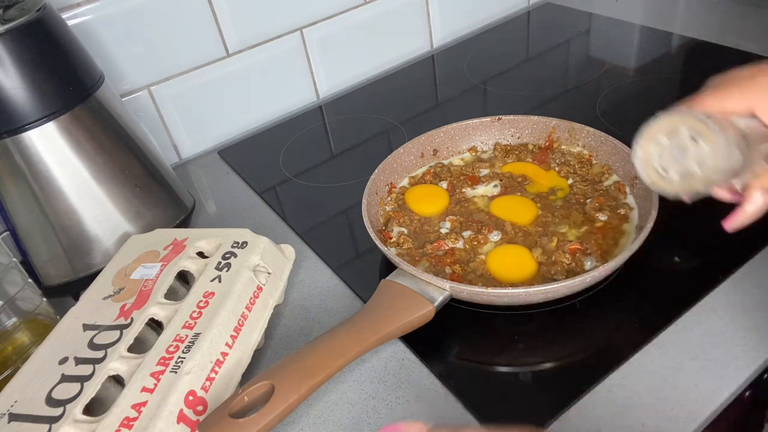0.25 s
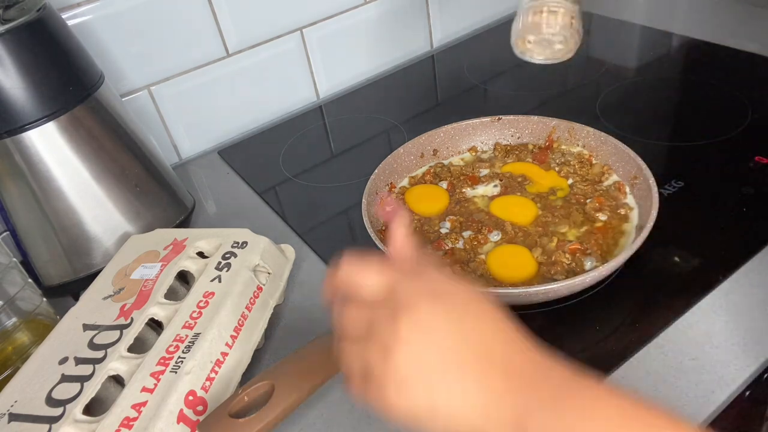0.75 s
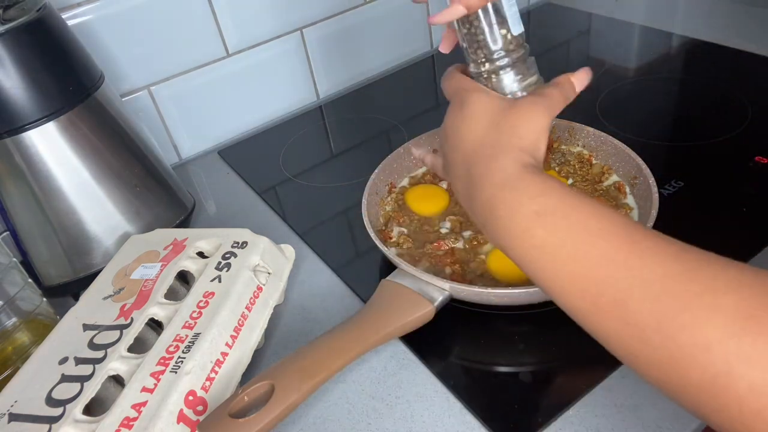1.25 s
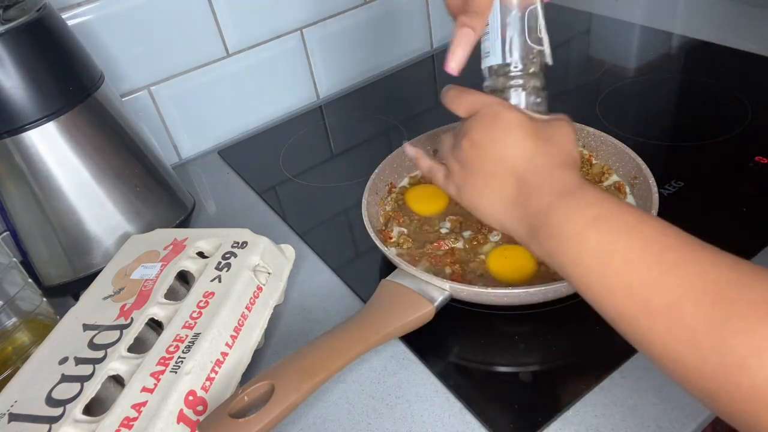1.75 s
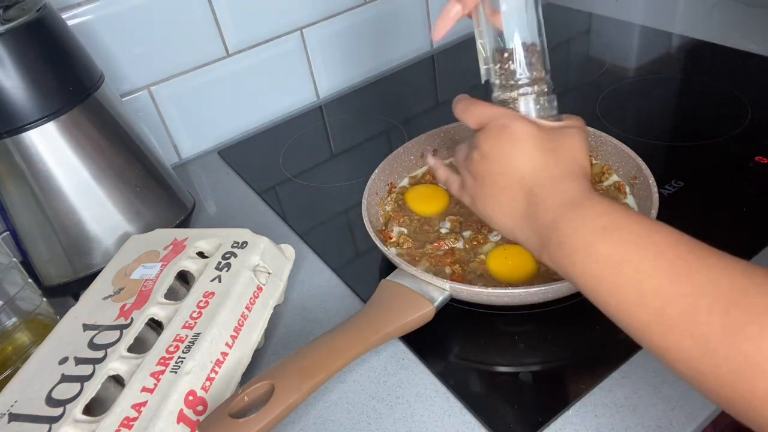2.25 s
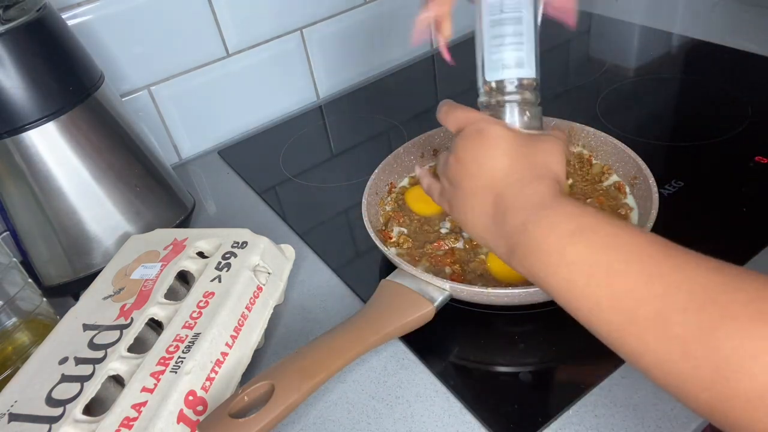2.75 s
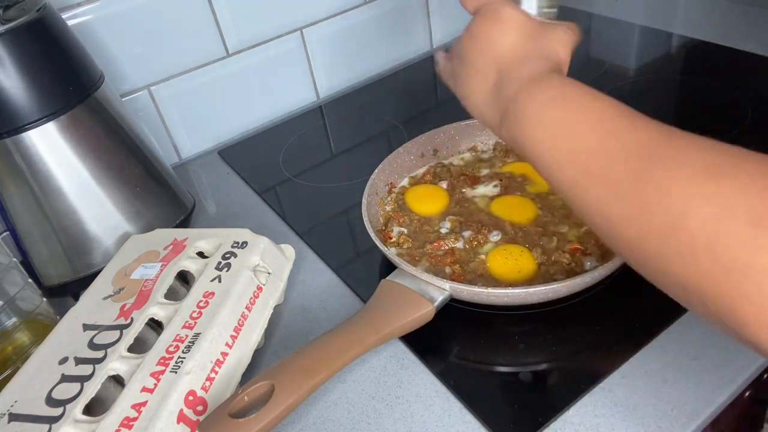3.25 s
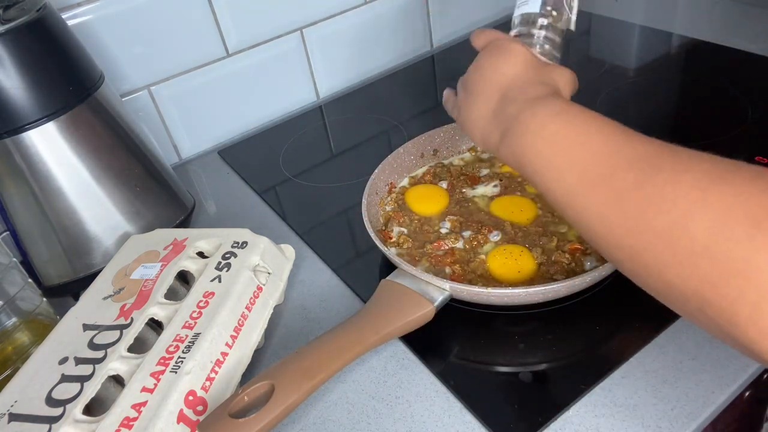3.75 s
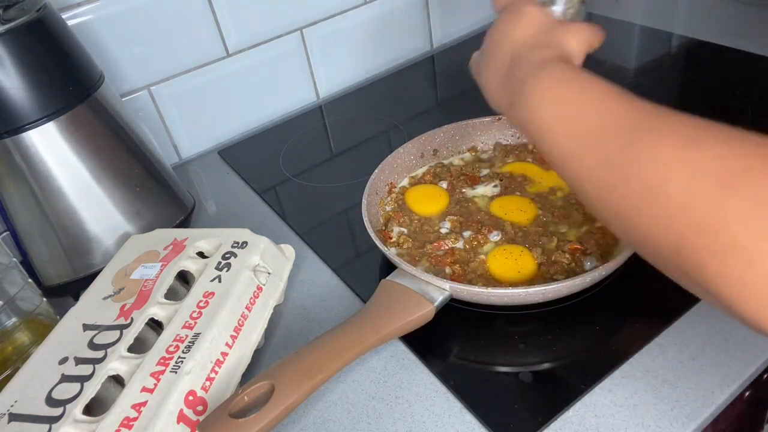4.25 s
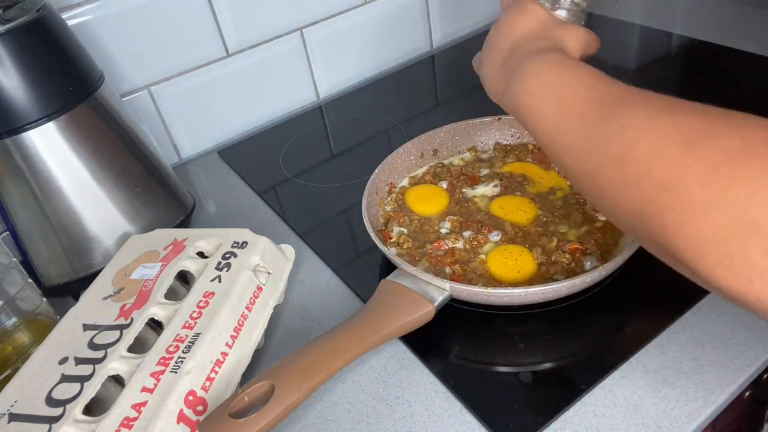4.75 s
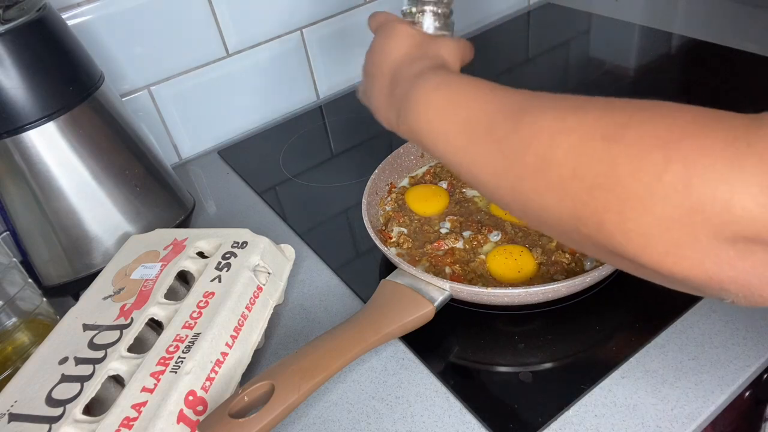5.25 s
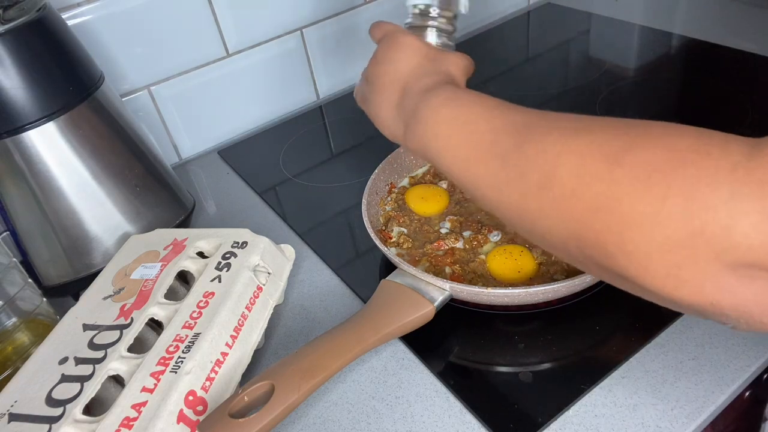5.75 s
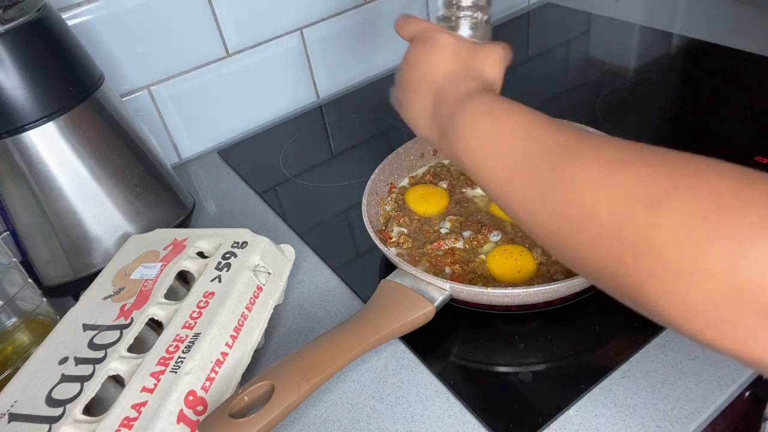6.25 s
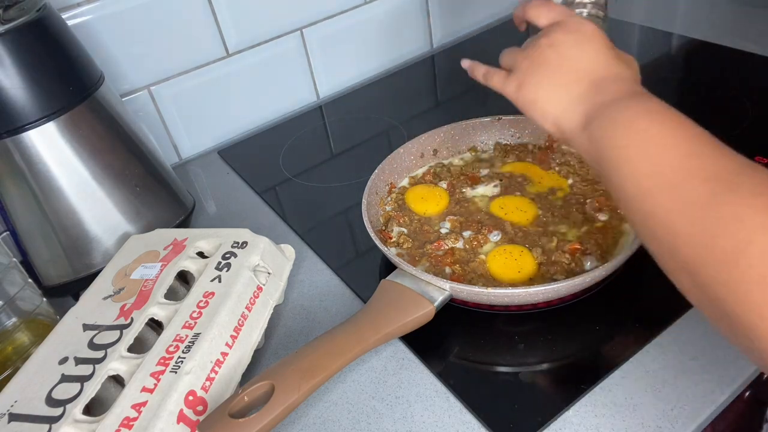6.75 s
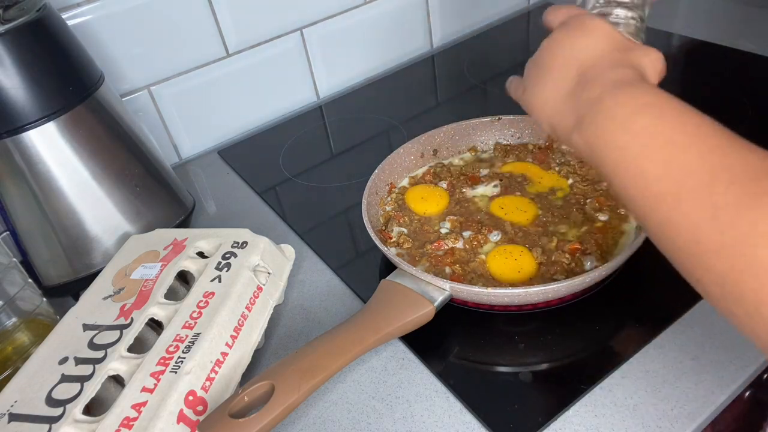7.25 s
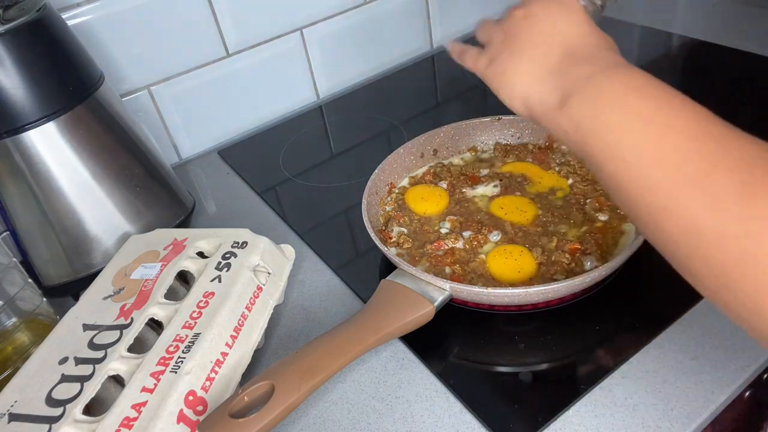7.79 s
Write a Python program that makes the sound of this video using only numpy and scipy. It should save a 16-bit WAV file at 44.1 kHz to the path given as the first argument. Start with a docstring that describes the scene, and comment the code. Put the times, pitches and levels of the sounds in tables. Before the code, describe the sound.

A small kitchen, heard close by a stereo phone, with quiet low rumble, faint steady mains hum and a distant engine slowly rising in pitch until about 3.2 s. At 0.2-0.35 s three hard, light knocks mark a glass pepper mill being lifted; corns slide faintly down the jar at 0.6-1 s. Soft crunches begin at 1.3 and 1.5 s, then a tick at 1.85 s starts regular twisting, roughly three a second. Each twist is a short dry crunch with brittle, bright snaps, a small hollow knock, and corns pattering on glass; sharp ticks precede most. The strongest cracks come near 3.15, 3.9 and 4.2 s, with another at 5.3 s. The far engine returns from 4.4 s, rising slowly. Twists grow less regular after 5.5 s; at 7.4-7.5 s a tick, crunch and tiny rough high squeak come last, leaving faint crumbs and rumble until 8 s.

```python
"""A glass pepper mill is picked up, tipped over a pan and twisted about three times a second in a small kitchen.
The burr crunches and peppercorns burst as uneven fractures driving husks, housing and hollow cap.
The cap ticks before most twists, loose corns patter and ring the jar, and the burr squeals once: a rough sine.
Behind it lie a mains hum (a sine), a low rumble (shaped noise) and a far engine (shaft orders) that
speeds up twice."""
import sys
import numpy as np
from scipy import signal
from scipy.fft import rfft, irfft
from scipy.io import wavfile
from scipy.ndimage import uniform_filter1d

SR = 44100
rng = np.random.default_rng(int(sys.argv[2]) if len(sys.argv) > 2 else 0)


def pcm_store(signal):
    """Save signal as 16-bit PCM."""
    levels = np.round(np.clip(np.atleast_2d(signal), -1, 1) * 32767)
    wavfile.write(sys.argv[1], SR, levels.astype(np.int16).T)


N = 353682
TIME = np.arange(N) / SR  # s

# All levels in the tables are relative; the functions set the balance between layers.
# Twists of the burr. Each row: start in seconds, length in seconds, level in dB, extra level of dry husks in dB.
TWISTS = [(1.281, .169, -61.5, 4.5), (1.467, .139, -50.5, 2), (1.96, 0.1, -48, 11),
          (2.401, 0.086, -43.5, -8), (2.748, .07, -47.5, 2), (3.141, 0.072, -42.5, 9),
          (3.491, 0.087, -44, 11.5), (3.847, 0.055, -47.5, 7), (4.174, .09, -42, -1.5),
          (4.534, 0.063, -49, 7.5), (4.865, 0.087, -44, 5.5), (5.079, 0.028, -50.5, 3),
          (5.268, 0.081, -49, -8), (5.618, 0.086, -51, 5.5), (5.93, 0.012, -51, 15),
          (6.301, 0.13, -51.5, 5.5), (6.588, 0.093, -67, 9), (7.019, 0.12, -46, 2.5),
          (7.456, 0.066, -43.5, 7)]
# Loudest peppercorns bursting. Each row: time in seconds, snap of the husk in dB, knock on the housing in dB,
# thud in the cap in dB, crumbling time constant in seconds.
BURSTS = [(1.2813, -32.5, -47.5, -48, 0.0037), (1.3548, -35, -50, -57, .0045),
          (1.517, -33.5, -41, -49, 0.0052), (1.5341, -26, -43, -44, 0.0026),
          (1.593, -33, -42.5, -42, 0.0022), (1.954, -33.5, -37.5, -59, 0.00073),
          (2.0255, -19, -29, -55, 0.0015), (2.0367, -23, -31, -38.5, .0028), (2.386, -32, -46, -47, .0045),
          (2.417, -18, -28.5, -35.5, 0.0036), (2.4443, -23.5, -45, -40, 0.0052),
          (2.4609, -18.5, -35.5, -37, 0.003), (2.7606, -29, -40, -63, 0.0013),
          (2.773, -24.5, -29.5, -36.5, 0.002), (2.816, -22, -42, -38, 0.0055),
          (3.1334, -28.5, -37.5, -52, 0.0037), (3.148, -8.5, -22.5, -36, 0.0025),
          (3.168, -33, -39, -43, 0.0028), (3.423, -28.5, -48, -44.5, .0015),
          (3.4968, -26, -43.5, -50, 0.0017), (3.8609, -29, -43, -45, .004),
          (3.9164, -11, -28.5, -42.5, 0.0022), (4.1923, -10, -29, -32, 0.0015),
          (4.2126, -35, -42, -54, 0.0022), (4.3928, -40.5, -50, -59, 0.00084),
          (4.562, -18.5, -32.5, -55, 0.00082), (4.5739, -23, -39.5, -39, 0.00069),
          (4.601, -26, -42.5, -55, 0.0016), (4.8875, -22.5, -40.5, -50, 0.0058),
          (4.9035, -29, -42, -36.5, .0046), (5.248, -35, -49.5, -55, .0016),
          (5.2808, -15, -32, -30.5, .0046), (5.3284, -31, -39.5, -43.5, .0012),
          (5.64, -30, -50, -51.5, 0.0032), (5.6983, -30.5, -50, -61, 0.0037),
          (5.896, -26.5, -39, -46, 0.0026), (5.9204, -15.5, -32, -35.5, 0.0023),
          (6.1159, -39.5, -48.5, -55, 0.0014), (6.415, -30.5, -44.5, -46, 0.0019),
          (6.579, -28.5, -42.5, -44.5, 0.0044), (6.82, -36.5, -50, -50, 0.0014),
          (6.887, -33.5, -47.5, -48.5, 0.0025), (7.0188, -33, -51, -48.5, 0.0033),
          (7.0786, -21, -43, -46.5, 0.0028), (7.0966, -21, -37, -49, 0.0018),
          (7.4568, -28.5, -52, -65, 0.0024), (7.4781, -30, -39.5, -42, 0.0012)]
# The cap ticks as the grip reverses. Each row: time in seconds, level in dB.
CAP_TICKS = [(1.8536, -21), (2.319, -19.5), (2.7017, -12), (2.9092, -34), (3.0494, -19.5), (3.4417, -18),
             (3.7967, -13), (4.094, -28.5), (4.1238, -17.5), (4.4935, -13.5), (4.8218, -17.5), (4.993, -34),
             (5.1478, -21), (5.5937, -19.5), (5.7437, -28), (6.212, -24), (6.2621, -18), (6.6504, -30.5),
             (6.781, -33), (7.389, -14)]
# Light knocks as the mill is picked up. Each row: time in seconds, contact level in dB, housing level in dB.
PICKUP_KNOCKS = [(0.2269, -23, -33.5), (0.2695, -11, -40), (0.3298, -19, -74)]
# Loose corns slide down the tipped jar. Each row: time in seconds, level in dB.
SLIDE_LEVEL = [(0.52, -88), (0.616, -56), (0.71, -60.5), (0.788, -43), (0.882, -49), (1.08, -86)]
# The burr squeals once. Each row: time in seconds, pitch in Hz, level in dB.
SQUEAL_PATH = [(7.48, 5660, -48), (7.489, 4900, -36), (7.494, 4760, -51), (7.499, 4930, -37),
               (7.508, 5510, -31), (7.516, 5500, -48), (7.53, 5300, -70)]
# Colours of the brittle husks, the hollow cap and the tick. Each row: frequency in Hz, level in dB.
HUSK_COLOUR = [(1500, -22), (3000, -7.5), (3700, -9.5), (4600, -8), (6000, -2), (7000, -1.5), (8200, 2),
               (9500, -8.5), (12000, -11), (15500, -17)]
CAP_COLOUR = [(140, -33.5), (260, 5.5), (400, 3), (620, 3.5), (850, 1), (1250, 0), (2200, -11), (6000, -45)]
TICK_COLOUR = [(600, -59), (1300, -26.5), (2300, -6.5), (3000, -8.5), (4300, -3.5), (5600, -6.5),
               (7000, -0.5), (9500, -2.5), (12000, -7), (16000, -11)]
# Modes of the housing. Each row: multiple of its pitch, level in dB, 60 dB decay time in seconds.
HOUSING_MODES = [(.66, -6, 0.0034), (.85, 1, 0.0046), (1, 1, .01), (1.14, 1, 0.0056), (1.36, 1.5, 0.0069),
                 (1.6, -0.5, 0.0025)]
# Modes of the glass jar and of the whole mill. Each row: frequency in Hz, level in dB, 60 dB decay in seconds.
JAR_MODES = [(5920, -6.5, 0.027), (6170, 0, 0.04), (6240, 1, 0.038), (6490, 1, 0.017), (15150, -11, .03)]
MILL_MODES = [(2600, -1, 0.0048), (3330, -2, 0.0087), (3690, 2.5, 0.012), (4300, 0, 0.0068),
              (6460, -3.5, 0.008), (7200, -3.5, 0.0048)]
# A far engine pulls through two gears. Each row: start in seconds, end in seconds, shaft speed at the start in Hz,
# rise in Hz per second, level in dB, tilt in dB per order.
ENGINE_PULLS = [(-.2, 3.25, 20.2, 1.5, -47, -.5), (4.401, 8.3, 18.9, .7, -51, -2.5)]
# Orders heard from the engine: multiples of the shaft speed, then the strength of each in dB.
ENGINE_ORDERS = (3, 4, 7, 8, 9)
ORDER_LEVELS = (0, -0.5, -2.5, -0.5, -3)
# What the walls let through of the engine. Each row: frequency in Hz, gain in dB.
WALL_GAIN = [(55, 4), (60, 4.5), (72, -17.5), (82, -1), (90, 3), (94, 0.5), (99, -1), (125, -13), (141, 6),
             (149, -5.5), (168, -3), (182, 2.5), (192, -10.5), (220, -22)]
# Colour of the room rumble and hiss. Each row: frequency in Hz, level in dB.
RUMBLE_COLOUR = [(20, -20), (36, -19), (50, -3), (65, 2), (90, -13), (120, -17), (180, -20.5), (260, -22.5),
                 (450, -29), (900, -33.5), (2000, -42.5), (5000, -46.5), (15000, -56.5)]
# Slow drift of the rumble. Each row: time in seconds, level in dB.
RUMBLE_DRIFT = [(0, 1.5), (.9, 0.5), (1.7, 0.5), (3.1, 0.5), (4.6, -1.5), (5.7, 1), (6.7, -2.5),
                (8.02, 0.5)]
# Tone of the centre, with a dip in the treble. Each row: frequency in Hz, mid gain in dB.
CENTRE_GAIN = [(9200, 0), (10000, -14), (11200, 1), (14800, 1), (15500, -11)]
# Stereo width of the phone. Each row: frequency in Hz, side gain in dB.
SIDE_GAIN = [(50, -20), (125, -4.5), (250, -6.5), (500, -2), (1000, 2.5), (2000, -4), (4000, -5.5),
             (5700, 1.5), (7000, -6.5), (8400, -2.5), (10000, 2), (11400, -0.5), (13000, -6), (14300, 5),
             (15300, 1)]

# The housing sounds lower once the hand has closed round it.
LOOSE_HZ, FIRM_HZ, GRIP_S = 2170, 1682, 3.14
# Corns tumble against the glass as the hand swings into a twist and as it lets go.
SWING_LEAD_S, SWING_S, SWING_DB = 0.027, 0.056, -37
RELEASE_LAG_S, RELEASE_S, RELEASE_DB = 0.073, 0.069, -35.5
HUM_HZ, HUM_DB = 99.6, -54.5
PORT_LAG_MS, TOP_HZ = 0.15, 15550


def undb(db):
    """Decibels to gain."""
    return 10 ** (np.asarray(db) / 20)


def unit(x):
    """Scale to an energy of one."""
    return x / np.sqrt(np.sum(x ** 2) + 1e-18)


def add(track, s, x):
    """Mix a sound into a track at a time in seconds."""
    i = max(round(s * SR), 0)
    track[i:i + len(x)] += x[:len(track) - i]


def curves(table):
    """The columns of a table, joined by straight lines in time."""
    s, *columns = np.transpose(table)
    return [np.interp(TIME, s, column) for column in columns]


def gains(points, size):
    """A spectrum on the bins of a transform, joined on a log frequency scale."""
    hz, db = np.transpose(points)
    bin_hz = np.arange(size // 2 + 1) * SR / size
    return undb(np.interp(np.log(bin_hz + 1), np.log(hz), db))


def colour(points, size=2048):
    """The shortest causal (minimum-phase) response with this spectrum, by folding its cepstrum."""
    cepstrum = irfft(np.log(gains(points, size)))
    cepstrum[1:size // 2] *= 2
    cepstrum[size // 2 + 1:] = 0
    return unit(irfft(np.exp(rfft(cepstrum))))


def ring(modes, pitch=1, size=2048):
    """A few damped modes answering one tap, with alternating signs."""
    t = TIME[:size]
    out = np.zeros(size)
    for k, (ratio, db, t60) in enumerate(modes):
        decay = undb(db - 60 * t / t60)
        out += (-1) ** k * decay * np.sin(2 * np.pi * pitch * ratio * t)
    return unit(out)


def grains(n, rate, spread_db):
    """Tiny fractures at random moments (rate per second), a few far larger than the rest; rms one."""
    hit = rng.random(n) < rate / SR
    size = undb(spread_db * np.minimum(rng.exponential(size=n), 4))
    return unit(hit * size * rng.choice([-1, 1], n)) * np.sqrt(n)


def walk(rate):
    """A smooth random wander about zero, with new steps at this rate per second."""
    k = int(SR / rate)
    steps = np.repeat(rng.standard_normal(N // k + 1), k)
    return uniform_filter1d(uniform_filter1d(steps, k), k)[:N]


def swell(s, half_s):
    """A smooth rise and fall round a moment, a bit over half height half_s away from it."""
    return np.maximum(1 - ((TIME - s) / (2 * half_s)) ** 2, 0) ** 2


def through(x, response):
    """Drive a response with a force."""
    return signal.fftconvolve(x, response)[:N]


def mill(force, husks_db, housing_db, thud_db, start, seconds):
    """One force sounds the husks, the housing and the hollow cap; each level is an rms over the given time."""
    grip_hz = LOOSE_HZ if start < GRIP_S else FIRM_HZ
    pitch_hz = grip_hz * (1 + 0.043 * rng.standard_normal())
    husks = undb(husks_db) * unit(signal.fftconvolve(force, colour(HUSK_COLOUR)))
    housing = undb(housing_db) * unit(signal.fftconvolve(force, ring(HOUSING_MODES, pitch_hz)))
    thud = undb(thud_db) * unit(signal.fftconvolve(force, colour(CAP_COLOUR)))
    return np.sqrt(seconds * SR) * (husks + housing + thud)


def crunch(rate=900, spread_db=3.0, catch_db=3, brittle_db=-3, housing_db=-2, thud_db=-5):
    """Husks crumble in the turning burr, which catches and slips as the force wanders."""
    out = np.zeros(N)
    force = grains(N, rate, spread_db) * undb(catch_db * walk(200))
    for start, length, db, dry_db in TWISTS:
        i, n = int(start * SR), max(int(length * SR), 512)
        push = force[i:i + n] * signal.windows.tukey(n, .25)
        levels_db = db + dry_db + brittle_db, db + housing_db, db + thud_db
        add(out, start, mill(push, *levels_db, start, n / SR))
    return out


def cracks(debris_db=-19, debris_s=0.007, brittle_db=-9, housing_db=-1.0, thud_db=-2,
           delay_s=0.001111, rate=12000, spread_db=2.0):
    """A corn gives way in a few milliseconds of dense, uneven fractures, with sparser debris dying slower."""
    out, t = np.zeros(N), TIME[:2048]
    for s, snap_db, knock_db, cap_db, crumble_s in BURSTS:
        burst = grains(len(t), rate, spread_db) * np.exp(-t / crumble_s)
        debris = undb(debris_db) * grains(len(t), 700, 5.4) * np.exp(-t / debris_s)
        levels_db = snap_db + brittle_db, knock_db + housing_db, cap_db + thud_db
        add(out, s + delay_s, mill(burst + debris, *levels_db, s, .015))
    return out


def crumbs(rate=12, spread_db=1.5, brittle_db=-71, housing_db=-71, thud_db=-72):
    """Stray crumbs snap faintly in the burr from the first twist on."""
    out, start = np.zeros(N), TWISTS[0][0]
    n = N - int(start * SR)
    force = grains(N, rate, spread_db)[:n]
    add(out, start, mill(force, brittle_db, housing_db, thud_db, GRIP_S, n / SR))  # firm-grip pitch
    return out


def ticks(tick_db=8, ring_db=3.7, delay_s=.0015):
    """The cap takes up its slack in one sharp tick that rings the glass."""
    out = np.zeros(N)
    tick = undb(tick_db) * colour(TICK_COLOUR) + undb(ring_db) * ring(JAR_MODES)
    for s, level_db in CAP_TICKS:
        add(out, s + delay_s, undb(level_db) * tick)
    return out


def loose_corns(slide_db=-1, slide_ring_db=-31, slide_body_db=-15, tumble_db=-2, patter_db=-5, stir_db=-74):
    """Corns slide down the jar, then tumble round each twist from the third, more for a hard one, and keep stirring."""
    flow = undb(curves(SLIDE_LEVEL)[0]) * (TIME > SLIDE_LEVEL[0][0]) * (TIME < SLIDE_LEVEL[-1][0])
    slide = grains(N, 2500, 6.3) * flow
    motion = np.zeros(N)
    for start, length, db, _ in TWISTS[2:]:
        swing = undb(SWING_DB) * swell(start - SWING_LEAD_S, SWING_S)
        release = undb(RELEASE_DB) * swell(start + length + RELEASE_LAG_S, RELEASE_S)
        motion += np.sqrt(undb(db)) * (swing + release)
    stir = undb(stir_db) * (TIME > TWISTS[0][0])
    tumble = grains(N, 900, 8.3) * (motion + stir)
    patter = through(undb(slide_db) * slide + undb(patter_db) * tumble, colour(HUSK_COLOUR))
    taps = undb(slide_ring_db) * np.sqrt(flow) * grains(N, 900, 5.5)
    glass = through(taps + undb(tumble_db) * tumble, ring(JAR_MODES))
    body = undb(slide_body_db) * through(slide, ring(HOUSING_MODES, 1600))
    return patter + glass + body


def knocks(tap_db=1, ring_db=6, housing_db=24, housing_hz=1950, delay_s=0.0021):
    """Hard, light contacts ring the whole mill."""
    out = np.zeros(N)
    body = ring(HOUSING_MODES, housing_hz) + undb(-12) * colour(CAP_COLOUR)
    for s, level_db, body_db in PICKUP_KNOCKS:
        tap = undb(level_db + tap_db) * colour(TICK_COLOUR)
        add(out, s + delay_s, tap + undb(level_db + ring_db) * ring(MILL_MODES))
        add(out, s + delay_s, undb(body_db + housing_db) * body)
    return out


def squeal(rough=0.0365):
    """A short stick-slip whistle, its pitch roughened by a fast random wander."""
    hz, db = curves(SQUEAL_PATH)
    phase = 2 * np.pi * np.cumsum(hz * (1 + rough * walk(1500))) / SR
    sounding = (TIME > SQUEAL_PATH[0][0]) * (TIME < SQUEAL_PATH[-1][0])
    return np.sqrt(2) * np.sin(phase) * undb(db) * sounding


def echoes(near_db=-4, near_s=0.0027, room_db=-5, low_t60=0.32, high_t60=0.26, split_hz=3500, size=16384):
    """One path to a port: the direct sound, the quick answer of hob and tiles, a tail whose treble dies first."""
    t = TIME[:size]
    near = unit(grains(size, 6000, 0.98) * np.exp(-t / near_s) * (t > .0015))
    wash = grains(size, 8000, 0.71) * (t > .006)
    low = signal.lfilter(*signal.butter(1, split_hz, fs=SR), wash)
    high = wash - low
    tail = unit(low * undb(-60 * t / low_t60) + high * undb(-60 * t / high_t60))
    return (t == 0) + undb(near_db) * near + undb(room_db) * tail


def kitchen(x, size=16384):
    """The left port hears the mill a fraction of a millisecond late; it wanders, so each block gets new echoes."""
    hz = np.arange(N + 1) * SR / (2 * N)
    late = np.exp(-2j * np.pi * hz * PORT_LAG_MS / 1000)
    left = irfft(rfft(x, 2 * N) * late)[:N]
    out = np.zeros((2, N))
    for track, port in zip(out, [left, x]):
        for i in range(0, N, size):
            add(track, TIME[i], signal.fftconvolve(port[i:i + size], echoes()))
    return out


def engine(waver_db=4, wobble=0.0063, fade_s=0.16):
    """The shaft speeds up in each gear; its orders swell and fade as they cross the resonances of the walls."""
    out = np.zeros(N)
    wall_hz, wall_db = np.transpose(WALL_GAIN)
    for start, end, shaft_hz, rise, level_db, tilt_db in ENGINE_PULLS:
        hz = (shaft_hz + rise * (TIME - start)) * (1 + wobble * walk(6.9))
        turn = 2 * np.pi * np.cumsum(hz) / SR
        throttle = np.clip(np.minimum(TIME - start, end - TIME) / fade_s, 0, 1)
        for k, order_db in zip(ENGINE_ORDERS, ORDER_LEVELS):
            db = level_db + order_db + tilt_db * (k - ENGINE_ORDERS[0])
            db = db + np.interp(k * hz, wall_hz, wall_db) + waver_db * walk(11.0)
            out += throttle * undb(db) * np.sin(k * turn)
    return out


def hum():
    """Mains hum: one steady sine."""
    return undb(HUM_DB) * np.sin(2 * np.pi * HUM_HZ * TIME)


def rumble(rumble_db=-45):
    """Diffuse room rumble and hiss: coloured noise, independent left and right, drifting in level."""
    noise = irfft(rfft(rng.standard_normal((2, N))) * gains(RUMBLE_COLOUR, N), N)
    return undb(rumble_db + curves(RUMBLE_DRIFT)[0]) * noise / np.std(noise)


def background(engine_db=-4):
    """Far engine and hum in the centre, under the wide rumble."""
    return np.sqrt(2) * (undb(engine_db) * engine() + hum()) + rumble()


def scene():
    """The mill at work in the kitchen."""
    grinding = crunch() + cracks() + crumbs()
    handling = ticks() + loose_corns() + knocks() + squeal()
    return kitchen(grinding + handling) + background()


def record(dry):
    """The close ports hear the deep bass alike; the phone colours the treble, rounds peaks and cuts the top."""
    mid = irfft(rfft((dry[0] + dry[1]) / 2) * gains(CENTRE_GAIN, N), N)
    side = irfft(rfft((dry[0] - dry[1]) / 2) * gains(SIDE_GAIN, N), N)
    rounded = .75 * np.tanh(np.array([mid + side, mid - side]) / .75)
    top_cut = signal.ellip(8, .2, 70, TOP_HZ, fs=SR, output="sos")
    return signal.sosfilt(top_cut, rounded)


dry = scene()
out = record(dry)
pcm_store(out)
```